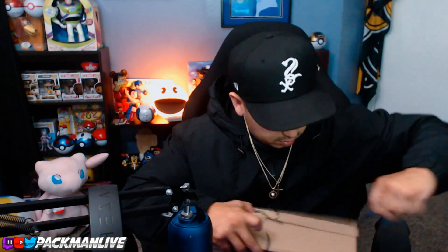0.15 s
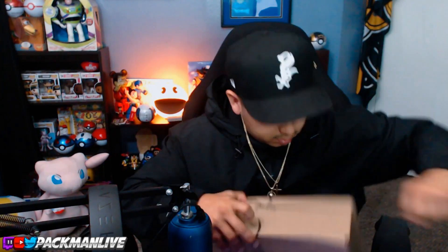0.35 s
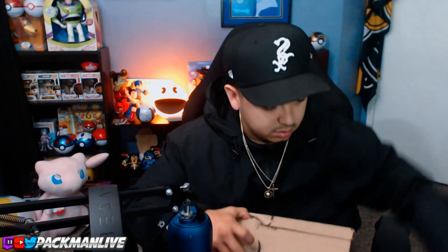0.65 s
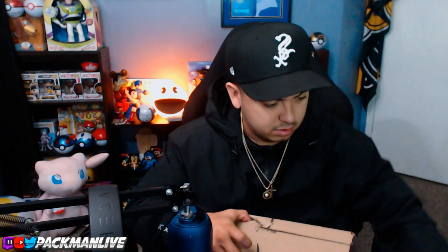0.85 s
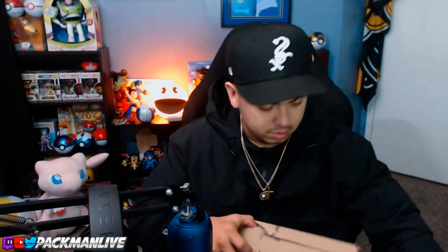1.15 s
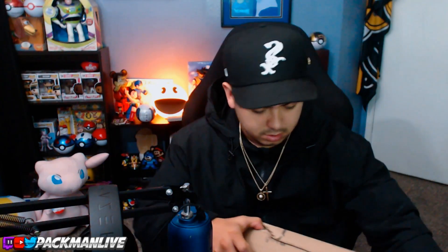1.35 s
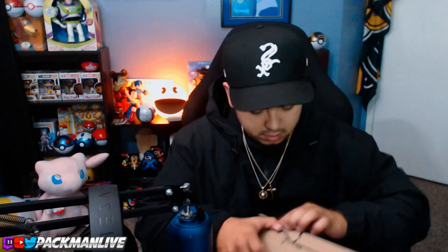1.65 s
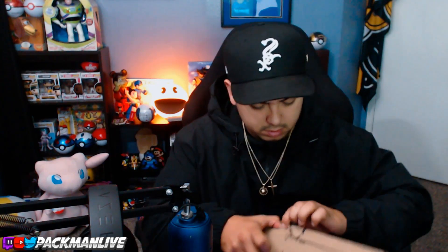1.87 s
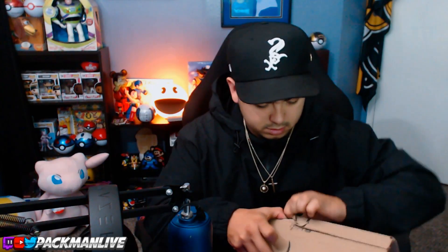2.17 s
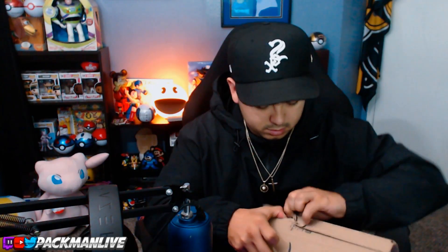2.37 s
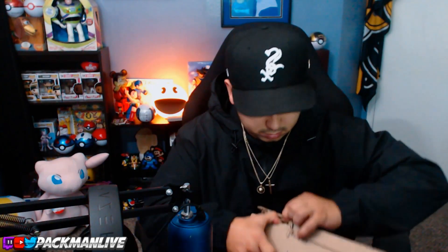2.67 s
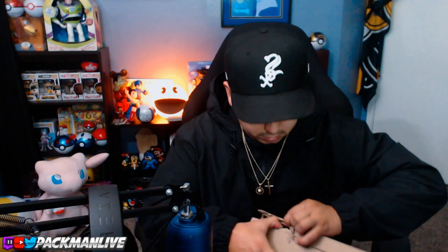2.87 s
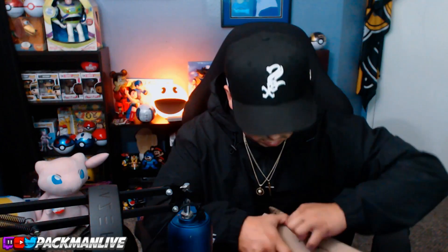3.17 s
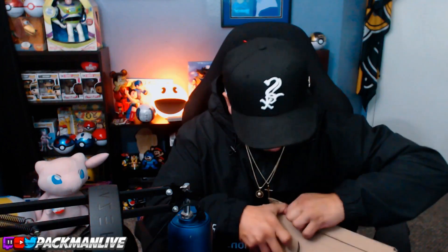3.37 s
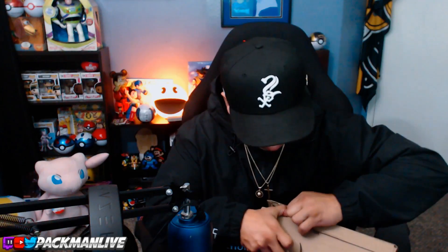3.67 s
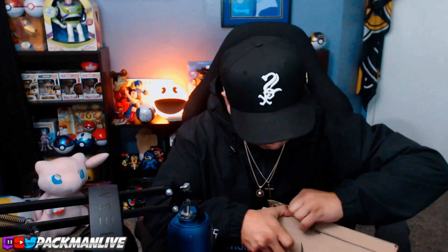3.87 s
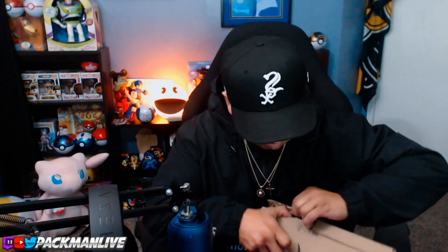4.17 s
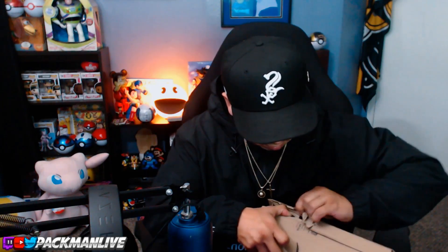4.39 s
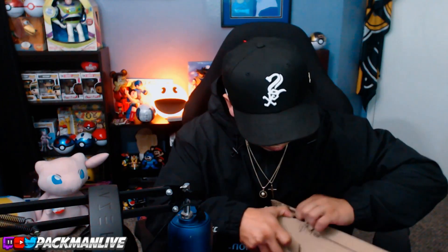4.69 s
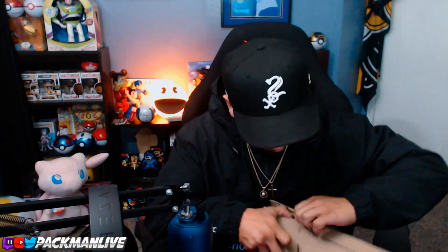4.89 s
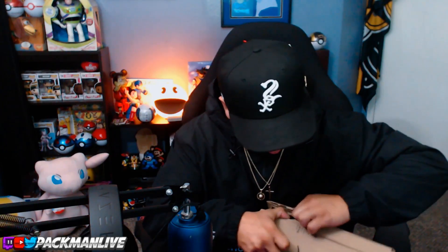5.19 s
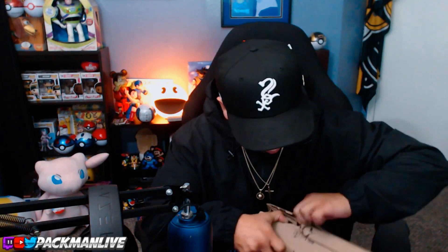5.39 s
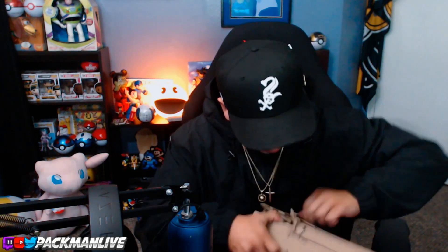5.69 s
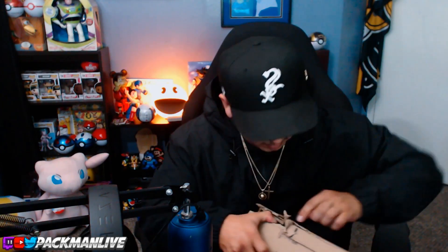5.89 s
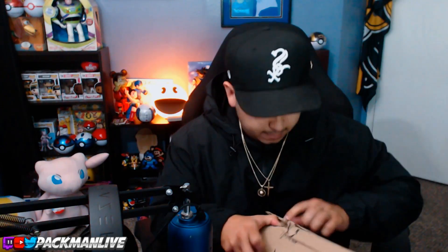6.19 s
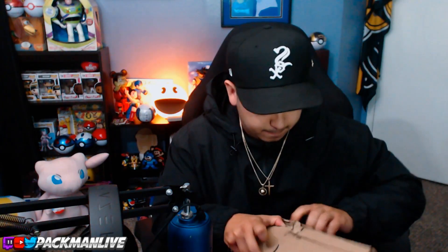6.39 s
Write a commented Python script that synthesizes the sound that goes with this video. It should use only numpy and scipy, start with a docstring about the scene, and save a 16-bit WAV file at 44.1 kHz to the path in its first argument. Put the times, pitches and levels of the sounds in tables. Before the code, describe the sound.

Dry, close-miked cardboard tearing: an abrupt snap and scrape at the start, a near-silent gap, then a quick bouncing clatter of a tool put down at a distance, ringing dully. Small finger scrapes and fibre crackles grow busier, then come hard rips and boxy thumps, the loudest past five seconds. A sleeve swishes and smaller tears end it in a small furnished room.

```python
"""Rips, cracks and hollow thumps of a corrugated cardboard box, torn by hand close to a desk microphone.
Shaped noise bursts drive fibre and board colours as decaying modes thump; between rips, crackle scrapes on.
After a short noise puff, a dropped tool bounces further off as noise hits and leaves a ring of decaying modes.
A sleeve swishes twice as swelling noise; a small room adds a diffuse tail and a faint tone of its own.
A noise gate shuts in the pauses."""
import sys
import numpy as np
from scipy import signal
from scipy.fft import rfft, irfft
from scipy.io import wavfile
from scipy.ndimage import uniform_filter1d

SR = 44100
rng = np.random.default_rng(int(sys.argv[2]) if len(sys.argv) > 2 else 0)


def master(y):
    """Save y as 16-bit WAV."""
    cut = np.clip(np.atleast_2d(y).T, -1, 1)
    pcm = np.round(cut * 32767)  # scale
    wavfile.write(sys.argv[1], SR, pcm.astype(np.int16))


N = 288502
TIME = np.arange(N) / SR
HIT = TIME[:8192]  # time axis of one hit [s]

# modes of the hollow box panels: (frequency [Hz], level [dB], t60 [s])
PANEL_MODES = [(55.6, -14.5, 0.07), (131, -6.5, 0.014), (199.8, -3.5, 0.053), (249.4, -5.5, 0.071),
               (316, -3, 0.047), (399.3, -4.5, 0.065), (436.6, -3, 0.057), (527, -0.5, 0.023)]
# colour of the cracking board: (frequency [Hz], relative level [dB])
BOARD_COLOUR = [(350, -37), (620, -2.5), (800, 6), (1300, 4.5), (2300, -2), (3100, -3), (3800, -16),
                (6000, -41.5)]
# colour of the parting fibres: (frequency [Hz], relative level [dB])
FIBRE_COLOUR = [(2000, -32.5), (3600, -5), (5000, -4.5), (6800, -0.5), (8800, 0.5), (10500, -7),
                (13000, -6.5), (16000, -11.5)]
# finger strokes, scraping or slowly tearing:
# (start [s], attack [s], length [s], panel rumble [dB], board rasp [dB], fibre fizz [dB], top-octave gain [dB])
STROKES = [(0.0, 0.00039, 0.032, -34, -31, -26, -1), (0.033, .005, 0.041, -29.5, -41, -41, 1),
           (0.114, 0.035, 0.036, -43, -51, -51, 3), (0.174, 0.045, 0.11, -34, -45, -51.5, -7),
           (0.303, .02, 0.065, -54, -59.5, -59, -12), (1.366, 0.027, 0.089, -50.5, -61.5, -89, -5),
           (1.539, 0.016, 0.077, -47.5, -65, -58.5, 6.5), (1.807, 0.0072, 0.058, -39, -49.5, -56, -7),
           (1.872, 0.0087, 0.061, -58, -74, -67, 4), (2.008, .008, 0.034, -52, -72, -66, 18.5),
           (2.062, 0.011, 0.059, -46, -56, -51.5, -3), (2.259, 0.017, 0.041, -45, -60, -72, 2),
           (2.312, 0.0069, 0.056, -49, -52, -53, 1), (2.42, 0.034, 0.067, -59.5, -59, -53, 3),
           (2.564, 0.0052, 0.038, -48.5, -60, -58.5, -8), (2.639, 0.044, 0.034, -61.5, -93.5, -74, 7.5),
           (3.024, 0.0087, 0.082, -45, -54, -57, 6), (3.107, 0.047, 0.06, -49, -45.5, -45, -7),
           (3.195, 0.011, 0.098, -55.5, -73, -77.5, 9), (3.323, .02, 0.054, -63.5, -63, -58, 1),
           (3.484, 0.01, .07, -55, -64.5, -60, 1), (3.565, 0.022, 0.066, -48, -58.5, -55, 5),
           (3.65, .015, 0.22, -59, -66.5, -57, 2), (3.781, 0.0094, 0.027, -53, -42.5, -36, 6),
           (3.825, .005, 0.086, -58.5, -61, -51, 2), (3.961, .02, .045, -57.5, -84, -90.5, 6),
           (4.007, 0.008, .07, -45.5, -52, -46.5, 0), (4.134, 0.007, 0.02, -48, -43.5, -50.5, 0),
           (4.18, .015, 0.11, -58, -57.5, -48, 0), (4.274, .005, 0.059, -53, -58, -39.5, -1.5),
           (4.344, 0.0067, 0.12, -61, -68, -65, 6.5), (4.436, 0.17, 0.216, -52, -59, -55, -5.5),
           (4.622, 0.019, 0.058, -40, -53, -52.5, 3), (4.955, 0.005, 0.019, -34, -34, -33.5, -5.5),
           (4.977, 0.014, 0.027, -25, -23.5, -31.5, -0.5), (5.077, 0.027, 0.067, -55.5, -69.5, -51.5, 5.5),
           (5.197, 0.059, 0.055, -41, -47, -42, 6), (5.301, 0.053, .055, -42, -50.5, -49.5, -4),
           (5.361, 0.0039, 0.058, -31.5, -37, -34.5, -5), (5.426, .005, 0.18, -38, -53, -57, -2.5),
           (5.645, 0.033, 0.039, -32, -44, -53.5, -9), (5.775, 0.14, 0.39, -59.5, -56.5, -59, -2),
           (6.131, 0.075, 0.063, -68, -65, -59, 7), (6.295, 0.017, 0.05, -36, -44.5, -45.5, -7),
           (6.349, 0.03, 0.031, -47, -54, -51.5, 6.5), (6.397, 0.095, 0.1, -41.5, -48.5, -52.5, -11),
           (6.507, 0.018, .03, -44, -33, -36.5, 4)]


def undb(db):
    """Decibels to gain."""
    return 10 ** (np.asarray(db) / 20)


def unit(x):
    """Scale to rms 1."""
    return x / np.sqrt(np.mean(x ** 2))


def blow(x):
    """Scale a hit to the energy of 5 ms of sound at rms 1."""
    return x * np.sqrt(.005 * SR / np.sum(x ** 2))


def add(out, start_s, x):
    """Mix x into out from start_s on."""
    i = int(np.clip(start_s * SR, 0, N - 1))
    out[i:i + len(x)] += x[:N - i]


def through(x, response):
    """Pass a sound through an impulse response."""
    return signal.fftconvolve(x, response)[:len(x)]


def log_frequency(size):
    """Spectrum bins of a block of samples, in octaves above 1 Hz."""
    return np.log2(np.maximum(np.fft.rfftfreq(size, 1 / SR), 1))


def colour(points, ripple_db=0, peak_hz=1000, peak_db=0, size=1024, count=90):
    """Causal response of a spectrum, with chance resonances and one broad chosen resonance."""
    hz, db = np.transpose(points)
    octave = log_frequency(size)
    curve = np.interp(octave, np.log2(hz), db)
    ripple_octave = np.linspace(np.log2(300), octave[-1], count)
    curve += ripple_db * np.interp(octave, ripple_octave, rng.standard_normal(count))
    curve += peak_db * np.exp(-((octave - np.log2(peak_hz)) / .25) ** 2)
    # fold the cepstrum forward in time: minimum phase, so the sound starts at once
    cepstrum = irfft(np.log(undb(curve)))
    cepstrum[1:size // 2] *= 2
    cepstrum[size // 2 + 1:] = 0
    return irfft(np.exp(rfft(cepstrum)))


def ring(modes, t, detune=0, scatter_db=0):
    """Decaying modes; each touch meets them with its own weights, signs and tension."""
    hz, db, t60 = np.transpose(modes)[:, :, None]
    tension, weight, sign = rng.standard_normal((3, len(modes), 1))
    waves = np.sin(2 * np.pi * hz * (1 + detune * tension) * t) * undb(-60 * t / t60)
    return np.sum(waves * undb(db + scatter_db * weight) * np.sign(sign), axis=0)


def wander(rate):
    """Random values joined by straight lines, so many a second."""
    points = rng.standard_normal(4096)
    return np.interp(TIME * rate, np.arange(len(points)), points)


def pressure(start_s, attack_s, length_s):
    """Level of one stroke or puff: it builds, eases a little while it lasts and dies away at the release."""
    sag_db_per_s, release_s = 14, 0.017
    age = TIME - start_s
    hold = undb(-sag_db_per_s * np.clip(age, 0, length_s))
    release = np.exp(-np.maximum(age - length_s, 0) / release_s)
    return np.clip(age / attack_s, 0, 1) * hold * release


def room_tone(level_db=-66):
    """Steady noise of the room, heaviest in the bass."""
    # colour of the room's own noise: (frequency [Hz], relative level [dB])
    air_colour = [(20, 3.5), (55, 5.5), (110, -1.5), (250, -13.5), (600, -11.5), (2000, -37), (8000, -34.5),
                  (16000, -38.5)]
    noise = rng.standard_normal(N)
    return undb(level_db) * unit(through(noise, colour(air_colour, size=4096)))


def room(gap_s=0.0043, build_s=0.008):
    """Impulse response of a small furnished room: diffuse noise, each band with its own decay."""
    # the room's tail: (frequency [Hz], t60 [s], level against the sound sent in [dB])
    tail_bands = [(60, 0.2, -12.5), (296, 0.21, -13), (990, 0.53, -16), (2980, 0.22, -11.5),
                  (8000, 0.36, -17), (15000, 0.045, -11.5)]
    t = TIME[:SR]
    hz, t60, db = np.transpose(tail_bands)
    noise = rfft(rng.standard_normal(SR))
    octave = log_frequency(SR)
    onset = 1 - np.exp(-np.maximum(t - gap_s, 0) / build_s)
    out = 0
    # each row of the identity picks one band, cross-fading into its neighbours
    for share, decay_s, band_db in zip(np.eye(len(hz)), t60, db):
        fade = onset * np.exp(-np.log(1000) * t / decay_s)
        band = irfft(noise * np.interp(octave, np.log2(hz), share), SR)
        out = out + undb(band_db) * band * fade / np.sqrt(np.sum(fade ** 2))
    return out


def sleeve(fold_rate=60):
    """Cloth swishes as the arm swings out and back: coloured noise, roughened by folds, under a swell."""
    # swings of the arm: (middle [s], width [s], level [dB])
    swishes = [(0.534, 0.052, -62), (5.926, 0.054, -44)]
    # colour of the cloth: (frequency [Hz], relative level [dB])
    cloth_colour = [(100, 9.5), (500, 12), (1500, 9), (3200, 6), (4700, 2), (5800, 7.5), (8500, 4),
                    (12000, -3.5), (16000, -28)]
    swell = sum(undb(db) * np.exp(-((TIME - middle) / width) ** 2 / 2) for middle, width, db in swishes)
    cloth = 0
    for _ in range(3):
        weave = rng.standard_normal(N) * undb(4 * wander(fold_rate))
        cloth = cloth + through(weave, colour(cloth_colour, ripple_db=3.5))
    return swell * unit(cloth)


def noise_puff(start_s=1.071, attack_s=0.021, length_s=0.029, level_db=-43, rough_db=3):
    """A short, soft, band-limited puff of noise just before the clatter."""
    # colour of the puff: (frequency [Hz], relative level [dB])
    puff_colour = [(59, -45), (100, -21), (328, -5.5), (415, -15.5), (558, -8.5), (662, -36.5),
                   (1230, -11.5), (1550, -28.5), (2370, -20.5), (3400, -47), (6560, -28), (11200, -27),
                   (16000, -55.5)]
    rough_noise = rng.standard_normal(N) * undb(rough_db * wander(150))
    puff = unit(through(rough_noise, colour(puff_colour, ripple_db=1)))
    return undb(level_db) * pressure(start_s, attack_s, length_s) * puff


def dropped_tool(ring_db=-2, stilled_s=1.64, still_time_s=.02):
    """A few quick bounces excite short noise hits; what the tool lands on rings until it is stilled."""
    # the tool lands and bounces: (time [s], level [dB])
    bounces = [(1.1666, -24.5), (1.1703, -18.5), (1.174, -22), (1.1781, -19), (1.181, -28.5),
               (1.1847, -22.5)]
    # colour of each contact: (frequency [Hz], relative level [dB])
    landing_colour = [(90, -11), (190, -2.5), (330, 4), (600, -5), (1200, -1.5), (1750, -2), (2400, -10),
                      (4000, -18.5), (7000, -20.5), (11000, -28.5), (16000, -24)]
    # modes of what it lands on: (frequency [Hz], level before ring_db [dB], t60 [s])
    ring_modes = [(198, -24.5, 0.33), (254, -46, 1.2), (273.7, -39.5, 0.61), (315, -40, .35),
                  (342, -37.5, 2.1), (398, -31, .65), (431, -50.5, 2.9), (470, -40, .6), (1736, -41.5, .25)]
    clatter = np.zeros(N)
    for s, db in bounces:
        contact = rng.standard_normal(len(HIT)) * np.exp(-HIT / .003)
        hit = through(contact, colour(landing_colour, ripple_db=2))
        add(clatter, s, undb(db) * blow(hit))
    tone = np.zeros(N)
    add(tone, bounces[0][0], undb(ring_db) * ring(ring_modes, TIME[:SR]))
    damping = (1 - np.tanh((TIME - stilled_s) / still_time_s)) / 2
    return clatter, tone * damping


def crackle(rate, spread_db, most_db):
    """Fibres give way at random moments, so many a second: many small ones, a few large."""
    size = undb(np.minimum(spread_db * rng.exponential(size=N), most_db))
    return unit((rng.random(N) < rate / SR) * size * rng.choice([-1, 1], N))


def scraping(smooth=0.56, stick_db=2.0, slip_rate=110, count=8):
    """Fingers drag and peel the liner in stick-slip steps; the crackle shakes fibres, board and panels."""
    forces = np.array([pressure(start, attack, length) for start, attack, length, *_ in STROKES])
    part_db = [(panel_db, board_db, fibre_db) for *_, panel_db, board_db, fibre_db, _ in STROKES]
    levels = undb(part_db).T @ forces
    slips = undb(stick_db * wander(slip_rate))
    # the grip shifts between spots on the flap, each with its own resonances
    grips = np.array([undb(16 * wander(13)) for _ in range(count)])
    grips /= np.sqrt(np.sum(grips ** 2, axis=0))
    panel = board = fibre = 0
    for grip in grips:
        coarse = crackle(rate=550, spread_db=6, most_db=21) + smooth * rng.standard_normal(N)
        fine = crackle(rate=800, spread_db=6.5, most_db=25) + coarse / 2
        drag = grip * slips
        panel = panel + unit(through(drag * coarse, ring(PANEL_MODES, HIT, detune=.05, scatter_db=2.5)))
        board = board + unit(through(drag * coarse, colour(BOARD_COLOUR, ripple_db=5.5, count=60)))
        fibre = fibre + unit(through(drag * fine, colour(FIBRE_COLOUR, ripple_db=5, count=80)))
    return sum(level * unit(part) for level, part in zip(levels, (panel, board, fibre)))


def snaps(burst_s=0.00081, rise_s=.0001, thump_db=-1.5, push_s=0.00089, lead_s=0.0046, lead=.058,
          resonance_db=7):
    """Faint noise swells for a few milliseconds, then the snap breaks; board cracks and panels thump."""
    # the snaps, loud and faint: (time [s], panel thump before thump_db [dB], board crack [dB],
    # fibre fizz [dB], crack resonance [Hz])
    snap_events = [(0.027, -40.5, -34, -23, 1646), (0.0329, -13.5, -18, -19.5, 1574),
                   (0.0335, -24, -17.5, -32, 2920), (0.1923, -18.5, -26.5, -40.5, 2390),
                   (0.214, -25.5, -50, -50, 830), (0.2325, -40, -39, -44, 3020),
                   (0.2565, -37, -33.5, -44.5, 1790), (0.3249, -49.5, -56.5, -48, 1700),
                   (0.4375, -49.5, -56, -74, 812), (0.619, -59, -56, -89, 862),
                   (1.4195, -42.5, -48.5, -68, 1467), (1.8529, -34.5, -47, -47, 775),
                   (1.8603, -49, -48.5, -44.5, 820), (2.110, -39, -42.5, -44, 3290),
                   (2.3235, -55, -35, -34.5, 1240), (2.327, -25, -40, -39, 930),
                   (2.4691, -39, -55, -52, 1590), (2.5516, -53, -46, -42.5, 1290),
                   (2.6256, -37.5, -58, -50, 1253), (3.0378, -42, -43, -49.5, 930),
                   (3.056, -32, -45.5, -52, 896), (3.166, -34.5, -46, -40, 1250),
                   (3.348, -52.5, -59, -59, 1410), (3.372, -54, -55, -52, 1090),
                   (3.6076, -69, -51, -42, 1810), (3.68, -52, -48.5, -69, 980),
                   (3.7856, -30, -31.5, -28, 2394), (3.8151, -56, -37.5, -50, 2090),
                   (3.8409, -28, -33, -29.5, 1370), (4.0561, -35, -62, -43, 3000),
                   (4.063, -56, -36, -36, 3020), (4.142, -38.5, -44, -49.5, 1160),
                   (4.1576, -42.5, -53, -37, 840), (4.1766, -47, -49, -35, 3000),
                   (4.242, -65, -46, -35, 3200), (4.281, -39.5, -31.5, -29, 2030),
                   (4.393, -63.5, -64, -47, 3180), (4.4064, -76, -46.5, -39.5, 3150),
                   (4.6317, -38, -48.5, -42, 1107), (4.9586, -50, -30.5, -34, 2590),
                   (4.9716, -18.5, -19.5, -36, 2026), (4.9738, -25, -23.5, -19, 2060),
                   (4.9943, -21, -28.5, -28, 1370), (4.9909, -17, -18, -20.5, 1320),
                   (5.0016, -16, -26.5, -27, 2950), (5.067, -54, -43.5, -46, 3000),
                   (5.1333, -61.5, -45, -37.5, 3420), (5.337, -30, -41.5, -44, 2720),
                   (5.364, -8.5, -21, -19, 1360), (5.3912, -43.5, -36.5, -24.5, 1966),
                   (5.3993, -32.5, -24.5, -18, 3050), (5.4025, -6, -12.5, -18.5, 2850),
                   (5.4243, -18.5, -31, -39, 1243), (5.467, -18, -32.5, -38, 1670),
                   (5.5257, -23, -41, -44, 790), (5.5797, -32, -41.5, -54, 875),
                   (5.6473, -23, -33.5, -40.5, 1070), (5.671, -22, -33, -38, 1240),
                   (6.1938, -50.5, -47, -48, 1410), (6.3214, -26, -43, -49, 2690),
                   (6.329, -36.5, -36, -45, 2670), (6.5221, -21.5, -36, -46, 2860),
                   (6.5288, -19.5, -25.5, -24.5, 2010)]
    out = np.zeros(N)
    early_s, trail_s, trail = .01, .007, .11
    after = np.maximum(HIT - early_s, 0)
    # the break is over in a millisecond or two; stragglers trail after it
    shape = (1 - np.exp(-after / rise_s)) * (np.exp(-after / burst_s) + trail * np.exp(-after / trail_s))
    faint_swell = lead * np.exp(-np.abs(HIT - early_s) / lead_s)
    push = 1 - np.exp(-after / push_s)
    for s, panel_db, board_db, fibre_db, hz in snap_events:
        breaks = rng.standard_normal(len(HIT)) * undb(4 * rng.standard_normal(len(HIT)))
        fibre = through((shape + faint_swell) * breaks, colour(FIBRE_COLOUR, ripple_db=4.5, count=130))
        crack_colour = colour(BOARD_COLOUR, ripple_db=3.5, peak_hz=hz, peak_db=resonance_db)
        board = through(shape * breaks, crack_colour)
        panel = ring(PANEL_MODES, after, detune=.04, scatter_db=2.5) * push
        snap = undb(panel_db + thump_db) * blow(panel)
        snap += undb(board_db) * blow(board)
        snap += undb(fibre_db) * blow(fibre)
        add(out, s - early_s, snap)
    return out


def brighten(x, edge_hz=10500):
    """Raise or lower the top octave along a curve through the strokes' middles."""
    share = 1 - 1 / (1 + (np.fft.rfftfreq(N, 1 / SR) / edge_hz) ** 16)
    top = irfft(rfft(x) * share, N)
    start, _, length, *_, top_db = np.transpose(STROKES)
    gain = undb(np.interp(TIME, start + length / 2, top_db))
    return x + (gain - 1) * top


def scene(far_db=5):
    """The box is near the microphone; the tool lands further off and wakes more of the room."""
    near = brighten(snaps() + scraping()) + sleeve() + noise_puff()
    clatter, tone = dropped_tool()
    tail = through(near + undb(far_db) * clatter, room())
    return np.tile(near + clatter + tone + tail + room_tone(), (2, 1))


def gate(x, open_db=-64, hold_s=0.027, release_s=0.038, rumble_hz=200):
    """Noise gate, deaf to rumble: opens fast when the sound passes a threshold, holds briefly, then shuts."""
    heard = signal.sosfilt(signal.butter(2, rumble_hz, "high", fs=SR, output="sos"), x)
    loud = uniform_filter1d(heard ** 2, size=256) > undb(open_db) ** 2
    quiet_s = TIME - np.maximum.accumulate(np.where(loud, TIME, 0))
    gain = np.clip(1 - (quiet_s - hold_s) / release_s, undb(-45), 1)
    return uniform_filter1d(gain, size=128)  # soften the gate's corners


def record(dry):
    """One microphone on both channels: gated, clipped at full scale, then cut steeply above 15.9 kHz."""
    gated = np.clip(dry * gate(dry[0]), -1, 1)
    return signal.sosfilt(signal.ellip(8, .2, 70, 15900, fs=SR, output="sos"), gated)


dry = scene()
out = record(dry)
master(out)
```